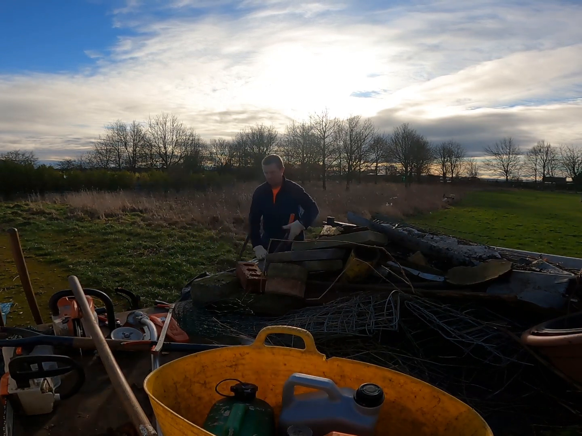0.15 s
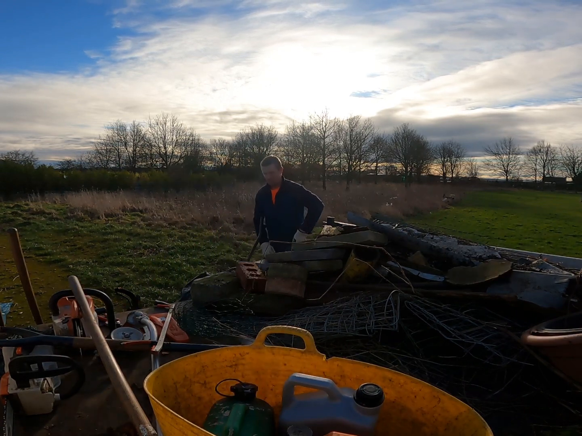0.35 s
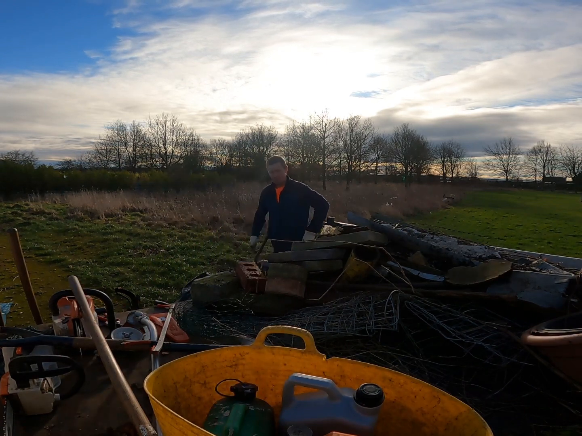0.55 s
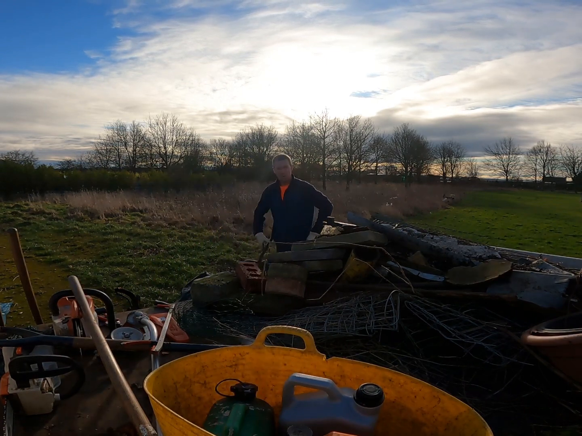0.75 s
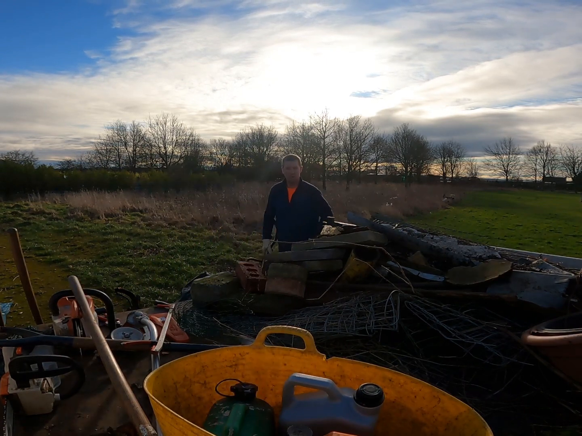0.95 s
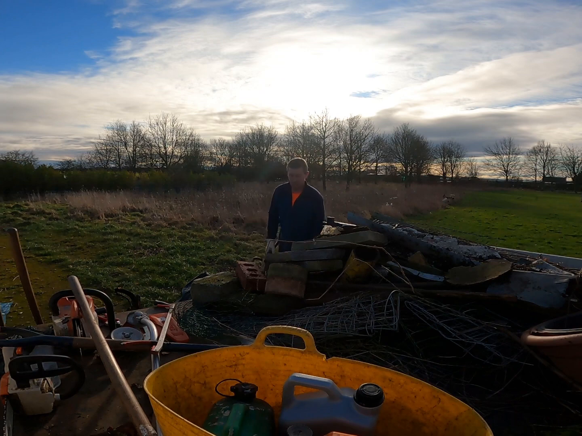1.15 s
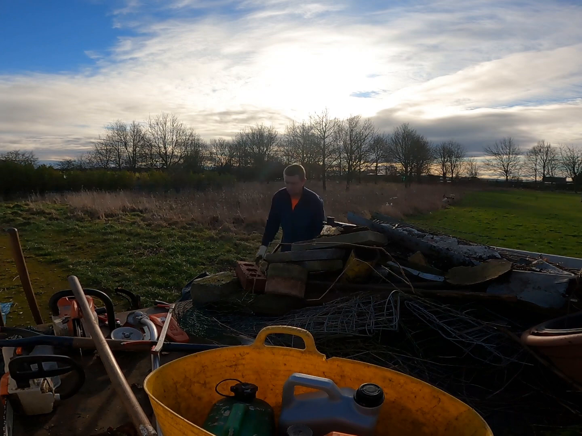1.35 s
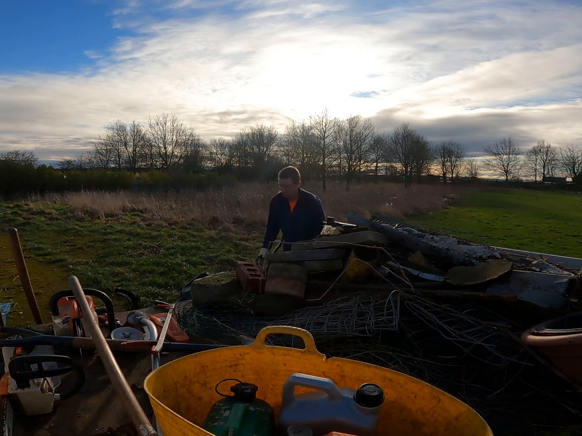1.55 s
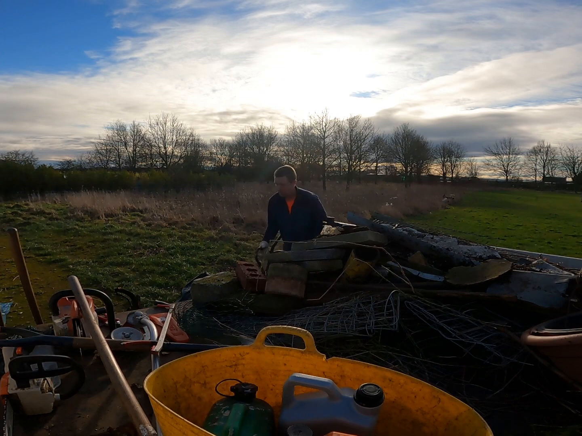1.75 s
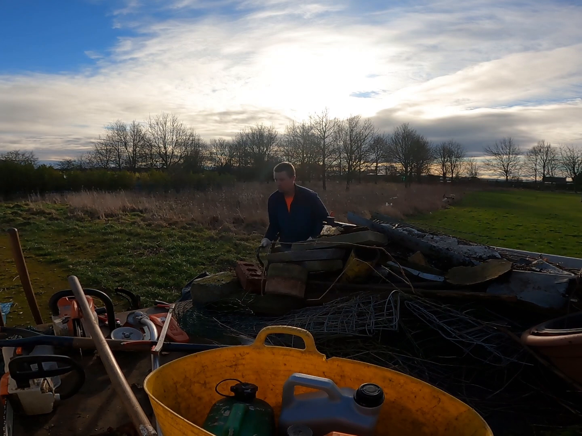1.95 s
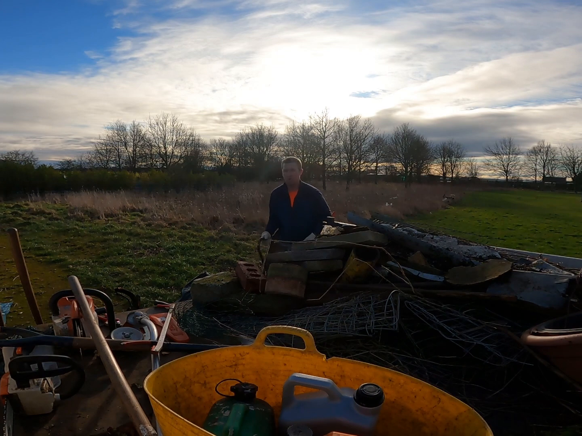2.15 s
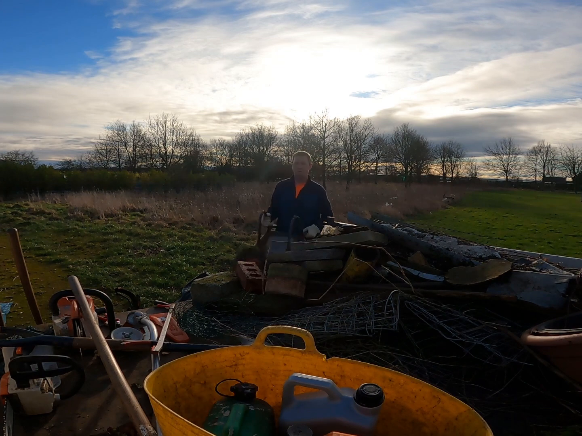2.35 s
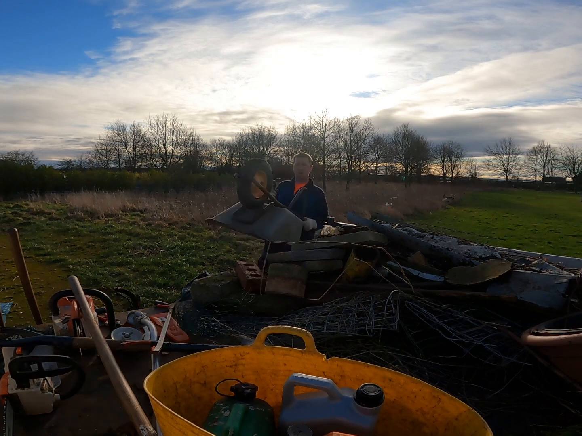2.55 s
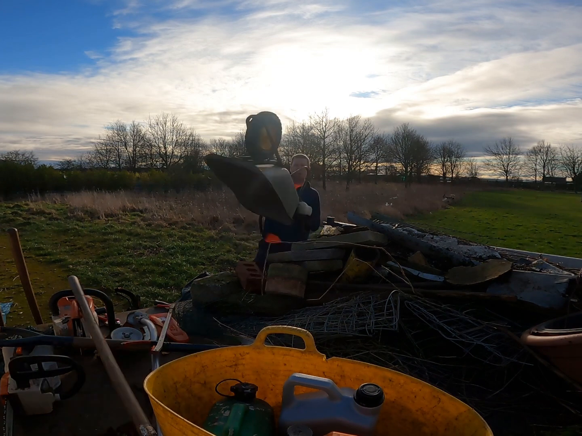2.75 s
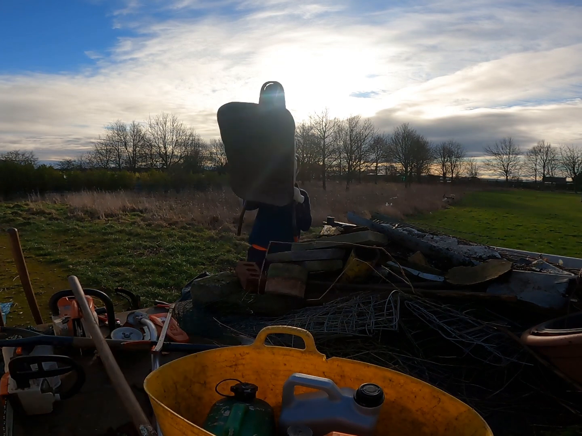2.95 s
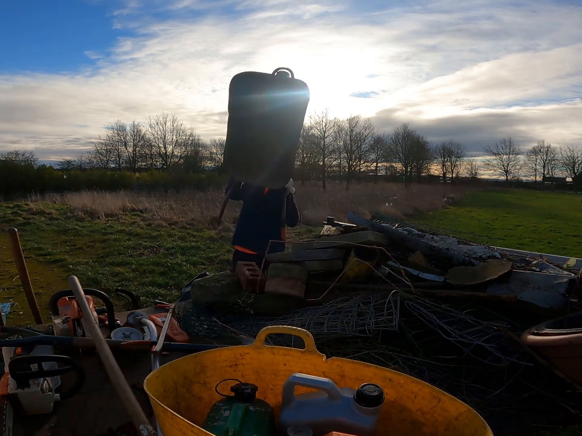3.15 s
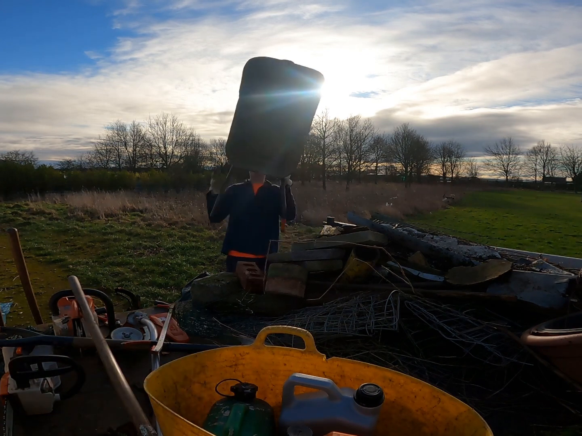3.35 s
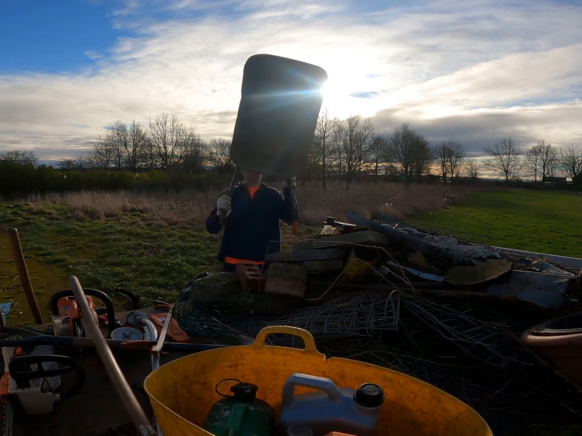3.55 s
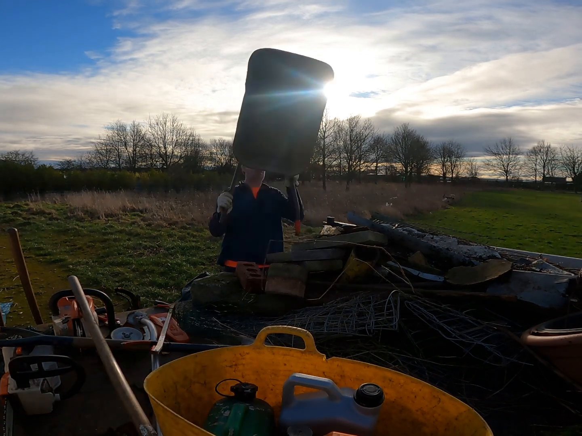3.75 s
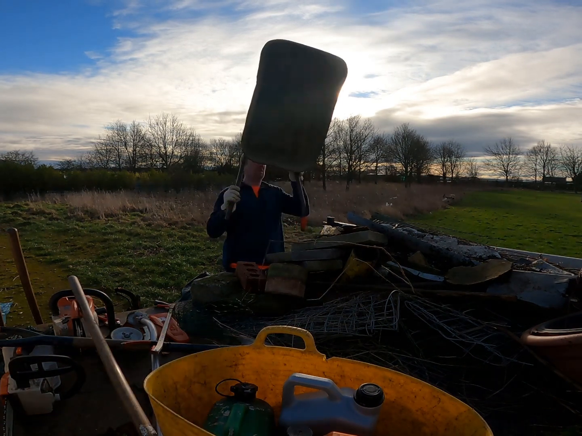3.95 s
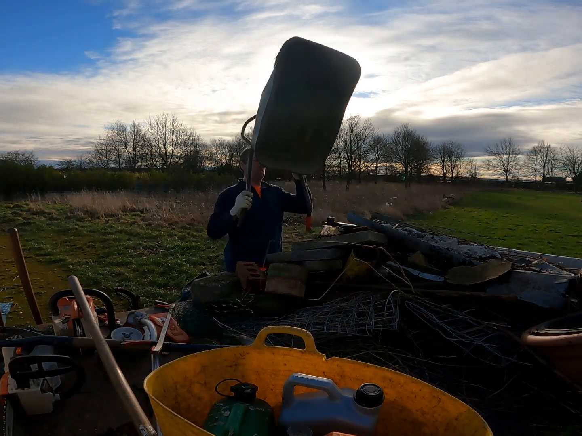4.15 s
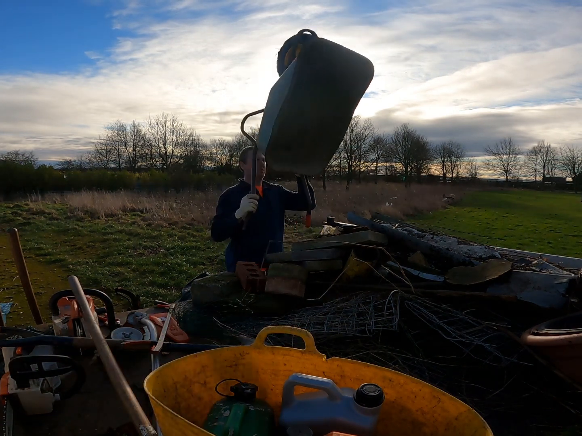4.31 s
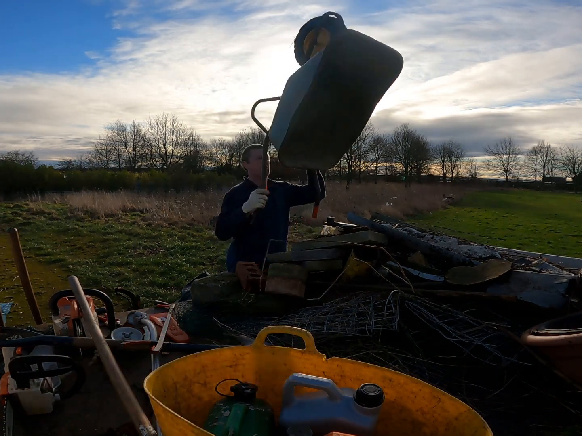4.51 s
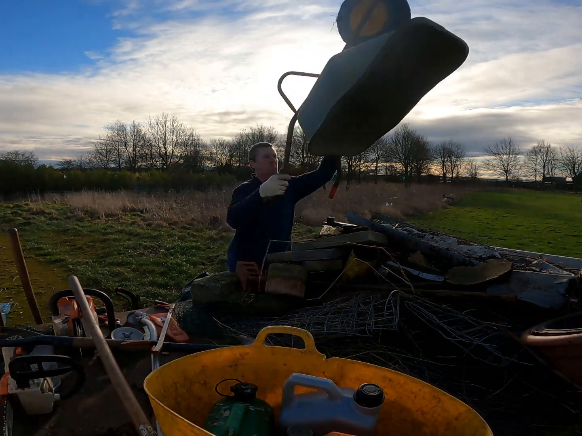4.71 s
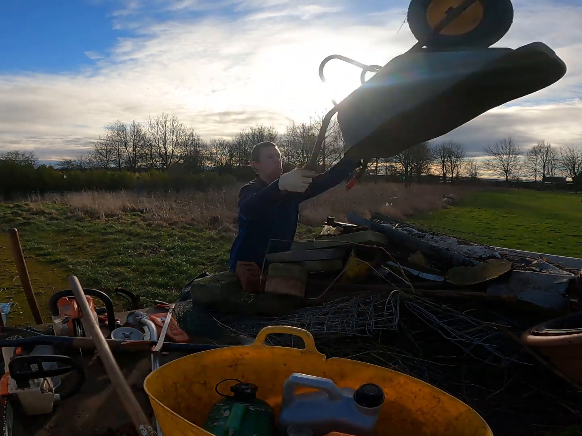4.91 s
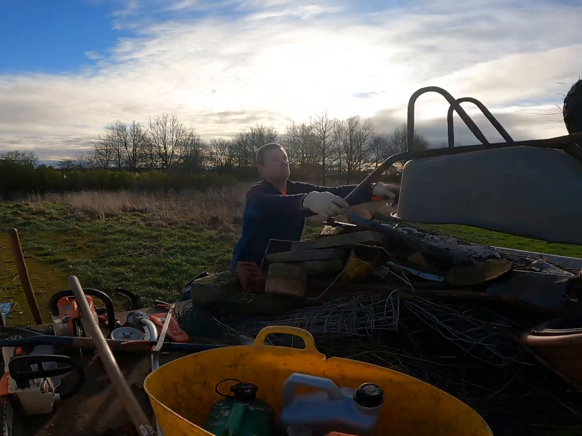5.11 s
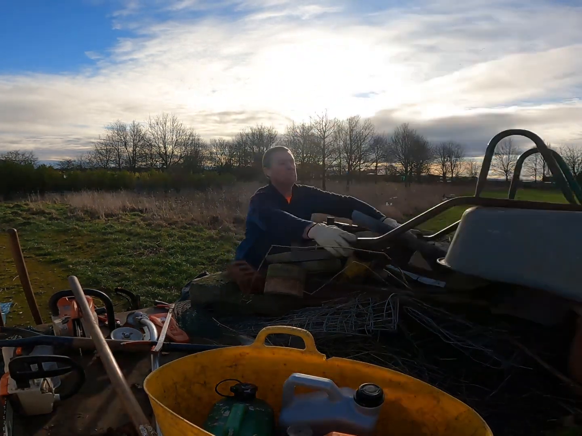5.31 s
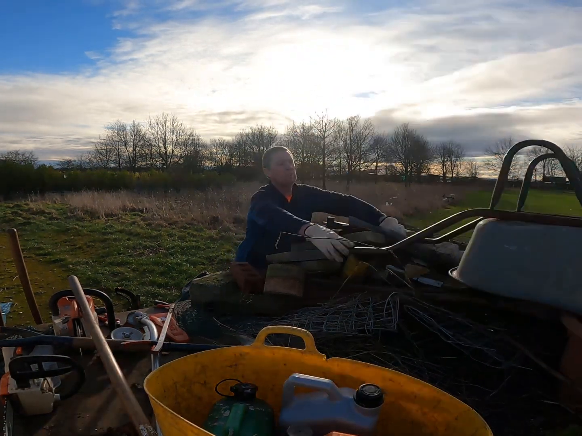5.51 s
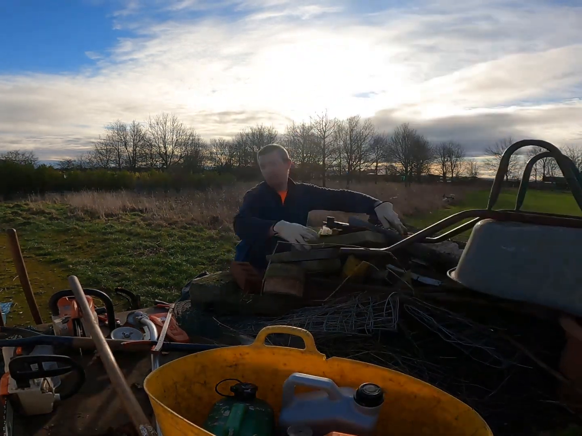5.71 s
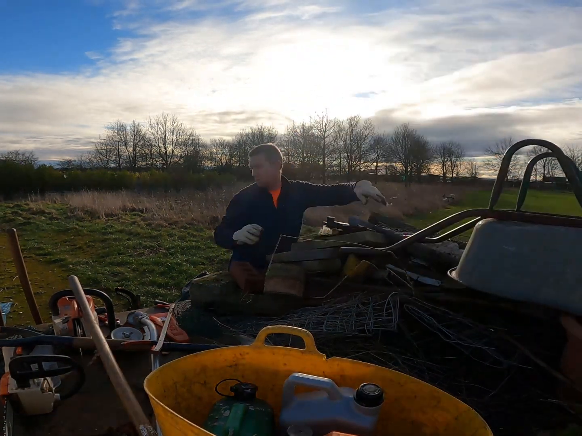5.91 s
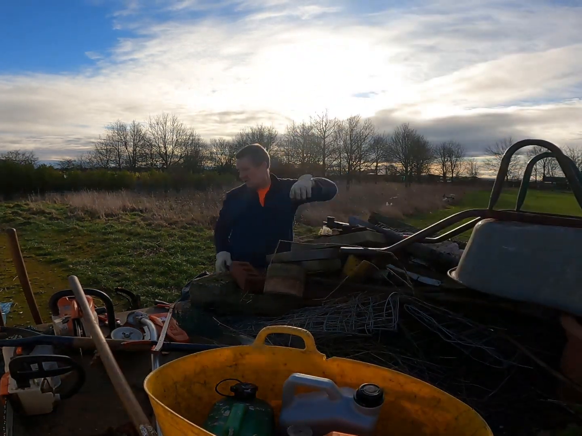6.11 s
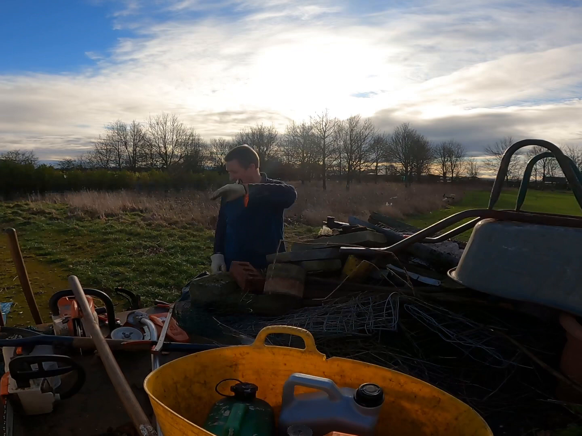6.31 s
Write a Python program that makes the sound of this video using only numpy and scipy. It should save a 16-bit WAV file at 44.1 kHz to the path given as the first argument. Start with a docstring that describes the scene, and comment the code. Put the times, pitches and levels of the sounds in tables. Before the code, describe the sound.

Quiet open air: distant traffic, wind rumble, a chirping bird and thin high whistles. Crunchy footsteps and cloth rustle lead to soft boomy bumps as an empty metal barrow is lifted. Its tray chatters in a fast, bouncing rattle, there is a pause with wind gusting, then one very loud, hard crash with deep thud, sheet steel clatter and debris, leaning right. Small clacks and a metallic clink end it. Microphone sits near the pile, dry outdoors.

```python
"""A steel wheelbarrow is hoisted overhead in a field, clatters as it is turned, and crashes onto rubbish on a trailer.
Each blow sums decaying tray and panel modes with chattering sheet steel; one tray mode hums as it is dragged.
The load thuds, crunches and scrapes in swings and gritty noise; a loose metal piece clinks in dying sines.
Around it: rustling steps and clothes in grainy noise, small birds in gliding sines,
light wind and a distant hum of traffic in shaped noise."""
import sys
import numpy as np
from scipy import signal
from scipy.fft import rfft, irfft, next_fast_len
from scipy.io import wavfile
from scipy.ndimage import uniform_filter1d

SR = 44100
rng = np.random.default_rng(int(sys.argv[2]) if len(sys.argv) > 2 else 0)


def materialize(psi):
    """Save the field psi as 16-bit PCM at rate SR to the path in sys.argv[1].

    A 1-D psi becomes a single channel; in a 2-D psi each row is a channel.
    """
    bounded = np.clip(np.atleast_2d(psi).T, -1, 1)
    quanta = np.round(bounded * 32767).astype(np.int16)
    wavfile.write(sys.argv[1], SR, quanta)


N = 280999
TIME = np.arange(N) / SR
TAIL = TIME[:3 * SR // 2]  # the longest a struck sound may ring


def amp(db):
    """Decibels to gain."""
    return 10 ** (np.asarray(db) / 20)


def unit(x):
    """Scales to an rms of one."""
    return x / np.sqrt(np.mean(x ** 2) + 1e-20)


def read(points, hz):
    """Reads a spectrum table on a log-frequency axis."""
    f, value = np.transpose(points)
    return np.interp(np.log(hz + 1), np.log(f + 1), value)


def level(curve):
    """Gain at every sample from rows (time [s], level [dB])."""
    return amp(np.interp(TIME, *np.transpose(curve)))


def add(mix, s, sound):
    """Mixes a sound in at s seconds."""
    part = mix[max(round(s * SR), 0):][:len(sound)]
    part += sound[:len(part)]


def colour(x, points):
    """Filters by a spectrum table."""
    size = next_fast_len(len(x))
    gain = amp(read(points, np.fft.rfftfreq(size, 1 / SR)))
    return irfft(rfft(x, size) * gain, size)[:len(x)]


def band(x, hz, spread):
    """A broad band from hz / spread to hz * spread."""
    edges = [hz / spread, hz * spread]
    return signal.sosfilt(signal.butter(2, edges, "band", fs=SR, output="sos"), x)


def grains(size, spread_db):
    """Noise made of tiny contacts of very uneven strength."""
    strength_db = spread_db * np.minimum(rng.exponential(1, size), 5)
    return unit(rng.standard_normal(size) * amp(strength_db))


def waver(length, size):
    """Slow chance, smoothed over size samples."""
    return unit(uniform_filter1d(rng.standard_normal(length), size=size))


def ringing(modes):
    """One dying sine for each mode, neighbours in opposite sign."""
    sines = []
    for k, (hz, db, t60) in enumerate(modes):
        sines.append((-1) ** k * amp(db - 60 * TAIL / t60) * np.sin(2 * np.pi * hz * TAIL))
    return np.array(sines)


# blows on the barrow: (time [s], strength [dB], centre of the boom [Hz], hardness as a cut-off [Hz])
BLOWS = [(2.621, -25.5, 180.6, 1200), (2.707, -29.5, 320, 880), (2.872, -27.5, 188.4, 680),
         (2.953, -29, 156, 930), (3.457, -32.5, 176, 830), (3.545, -32.5, 134, 1050),
         (5.072, -29, 308, 584), (5.200, -14.5, 122, 3630), (5.211, -12.5, 191, 4560),
         (5.236, -21, 270, 5030), (5.258, -27, 233, 2600), (5.320, -37, 292, 4030), (5.358, -23, 181, 1300),
         (5.380, -26.5, 149, 2140), (5.497, -26, 204, 4270)]
# turned overhead, the tray rocks against its frame, left and right in turn, rebounding ever sooner
RATTLE_S, REBOUND_S, REBOUND_SHRINK = 3.603, 0.058, 0.8  # start, first gap, ratio of each gap to the last
# loss and softening grow with the square of the rebound's number
RATTLE_DB, RATTLE_HARD_HZ, REBOUND_LOSS_DB, REBOUND_SOFTEN = -20, 4070, 0.49, 0.99
# the boom on either side of the rocking tray: (centre [Hz])
RATTLE_BOOM_HZ = [184, 114]


def blows():
    """All blows, including the tray's rebounds, which die faster and faster as the rocking collapses."""
    gaps = REBOUND_S * REBOUND_SHRINK ** np.arange(5)
    times = RATTLE_S + np.cumsum(np.r_[0, gaps])
    rattle = []
    for n, s in enumerate(times):
        db = RATTLE_DB - REBOUND_LOSS_DB * n ** 2
        hard_hz = RATTLE_HARD_HZ * REBOUND_SOFTEN ** n ** 2
        rattle.append((s, db, RATTLE_BOOM_HZ[n % 2], hard_hz))
    return BLOWS + rattle


# the tray's panels ringing: (frequency [Hz], level [dB])
PANEL_MODES = [(393, 3.5), (418, -3), (492, -4), (521, 0), (803, -11), (897, -11), (952, -10), (1163, -9),
               (1647, -13), (1703, -15)]
LOWEST_PANEL_T60_S, PANEL_WAVER_HZ = 0.6, 7.5


def panels():
    """The panel modes waver in pitch as the tray flexes; the higher ones die sooner."""
    hz, db = np.transpose(PANEL_MODES)[:, :, None]
    pitch = hz + PANEL_WAVER_HZ * np.array([waver(len(TAIL), size=500) for _ in PANEL_MODES])
    t60 = LOWEST_PANEL_T60_S * np.sqrt(hz[0] / hz)
    return amp(db - 60 * TAIL / t60) * np.sin(2 * np.pi * np.cumsum(pitch, axis=1) / SR)


# the crowd of higher sheet modes: (frequency [Hz], relative level per Hz [dB])
SHEET = [(50, -6.5), (130, 11), (300, 2.5), (1100, 0), (1800, -4.5), (2800, -8.5), (4500, -9), (6500, -16),
         (9000, -29), (12500, -23), (15500, -37)]
# how long the sheet modes ring: (frequency [Hz], t60 [s])
SHEET_T60 = [(500, 0.78), (1200, 0.57), (5000, 0.18), (12000, 0.54)]


def sheet_response():
    """Countless close modes of thin steel, each band dying at its own rate."""
    crowd = unit(colour(rng.standard_normal(len(TAIL)), SHEET))
    hz, t, z = signal.stft(crowd, SR, nperseg=512)
    decay = amp(-60 * t / read(SHEET_T60, hz)[:, None])
    return signal.istft(z * decay, SR, nperseg=512)[1][:len(TAIL)]


# the whole tray flexing, before the hold damps it: (frequency [Hz], level [dB], t60 [s])
BOOM = [(122.2, 4, 0.66), (151.4, -4.5, 1.26), (185, -2.5, 1.45), (206.5, -1, 1.5), (241.3, 5.5, 0.99)]
# how the barrow is held (in the arms, overhead, coming down) decides how it answers a blow:
# (from time [s], boom added to strength [dB], ring added to strength [dB], boom damping [dB per s])
HOLDS = [(0, 8, -21, 6.3), (3.3, 1.5, 0, 28), (4.9, 0, -12.5, 40)]


def barrow(boom_octaves=0.23, boom_rise=0.0013, ring_rise=0.0089, strike_spread=0.12,
           first_touch=0.86, rattle_db=0.5, chatter=0.0096):
    """Each blow flexes the tray, rings its panels and chatters on the sheet steel."""
    out, boom = np.zeros(N), ringing(BOOM)
    mode_hz = np.array(BOOM)[:, 0]
    sheets = [sheet_response() for _ in range(4)]
    t = TIME[:SR // 8]
    for k, (s, strength_db, boom_hz, hard_hz) in enumerate(blows()):
        _, boom_db, ring_db, damping = [hold for hold in HOLDS if hold[0] <= s][-1]
        # where the blow lands decides which modes answer
        share = np.exp(-0.5 * (np.log2(mode_hz / boom_hz) / boom_octaves) ** 2)
        low = amp(strength_db + boom_db - damping * TAIL) * (share @ boom)
        low *= 1 - np.exp(-TAIL / boom_rise)
        strikes = 1 + strike_spread * rng.standard_normal(len(PANEL_MODES))
        ring = amp(strength_db + ring_db) * (strikes @ panels())
        ring *= 1 - np.exp(-TAIL / ring_rise)
        # one firm touch, then a dying chatter of lighter ones
        force = grains(len(t), 6.36) * np.exp(-t / chatter)
        force /= np.linalg.norm(force)
        force[0] += first_touch
        force /= np.linalg.norm(force)
        clatter = amp(strength_db) * signal.fftconvolve(force, sheets[k % len(sheets)])[:len(TAIL)]
        # loose parts lift off and touch again, so the clatter comes in lumps
        lumps = waver(len(TAIL), size=350)
        clatter *= amp(rattle_db * lumps * np.minimum(TAIL / chatter / 2, 1))
        # a soft contact cannot excite the treble
        contact = signal.butter(2, hard_hz, fs=SR, output="sos")
        add(out, s, low + signal.sosfilt(contact, ring + clatter))
    return out


# the tray hums on one mode as it is dragged up off the pile: (time [s], level [dB])
DRAG = [(2.63, -36), (2.70, -43), (2.84, -20.5), (2.89, -22.5), (3.04, -30.5), (3.45, -66)]
DRAG_START_HZ, DRAG_SAG_HZ_PER_S = 211, 15.97


def drag(wander=0.026):
    """Friction keeps one tray mode humming; its pitch sags and wavers."""
    start, end = DRAG[0][0], DRAG[-1][0]
    sagging_hz = DRAG_START_HZ - DRAG_SAG_HZ_PER_S * (TIME - start)
    hz = sagging_hz * (1 + wander * waver(N, size=600))
    hum = np.sin(2 * np.pi * np.cumsum(hz) / SR)
    return hum * level(DRAG) * (TIME > start) * (TIME < end)


# steel sliding over the rubbish: (start [s], length [s], level [dB], centre [Hz])
SCRAPES = [(5.321, 0.017, -33.5, 3380), (5.484, 0.06, -32.5, 1060), (5.491, 0.063, -45.5, 3970)]
SCRAPE_ATTACK_S, SCRAPE_RELEASE_S = 0.0045, 0.014


def scrapes(spread=1.3, grain_db=4):
    """Short gritty slides that start, hold and stop."""
    out, t = np.zeros(N), TIME[:SR // 2]
    for s, length, db, hz in SCRAPES:
        slide = np.minimum(t / SCRAPE_ATTACK_S, 1)
        slide *= np.exp(-np.maximum(t - length, 0) / SCRAPE_RELEASE_S)
        grit = unit(band(grains(len(t), grain_db), hz, spread))
        add(out, s, amp(db) * slide * grit)
    return out


# dull knocks and thuds of handling, wind buffets and the trailer bed:
# (time [s], level [dB], frequency [Hz], t60 [s])
THUDS = [(0.02, -17, 132.4, 0.092), (2.62, -18, 1343, 0.025), (2.705, -29.5, 513, 0.026),
         (3.573, -21.5, 115, 0.31), (4.356, -25.5, 168, 0.23), (4.422, -24.5, 96.4, 0.41),
         (4.954, -12, 71, 0.25), (5.202, -4, 93, 0.18), (5.233, -16, 128, 0.076), (5.437, -17, 97.7, 0.58)]
# heavy steps into the undergrowth, which also crunch: (time [s], level [dB])
STEPS = [(1.907, -38.5), (2.05, -32.5)]
STEP_HZ, STEP_T60_S = 132, 0.95


def thuds(rise=0.004, loose=0.75, spread=1.6):
    """A low swing that dies away, with an irregular rumble around it."""
    out = np.zeros(N)
    footfalls = [(s, db, STEP_HZ, STEP_T60_S) for s, db in STEPS]
    for s, db, hz, t60 in THUDS + footfalls:
        rumble = unit(band(rng.standard_normal(len(TAIL)), hz, spread))
        swing = np.sin(2 * np.pi * hz * TAIL) + loose * rumble
        add(out, s, swing * amp(db - 60 * TAIL / t60) * (1 - np.exp(-TAIL / rise)))
    return out


# snaps and clacks of twigs, the frame and brittle rubbish:
# (time [s], level [dB], centre [Hz], t60 [s])
SNAPS = [(.070, -40, 1100, 0.063), (.122, -46, 1200, 0.063), (.249, -44.5, 1980, 0.28),
         (1.907, -38, 835, 0.071), (2.051, -40.5, 2980, 0.17), (2.185, -46, 1930, .16),
         (2.621, -51, 2600, 0.045), (3.085, -45, 2100, .09), (3.118, -50, 2350, 0.055),
         (3.457, -48, 3300, 0.2), (3.493, -39.5, 2940, 0.24), (5.1995, -4, 1770, 0.0043),
         (5.211, -35, 11000, 0.21), (5.338, -37.5, 11000, 0.028), (5.773, -50, 2840, .07),
         (5.832, -38.5, 1600, .05), (5.862, -32.5, 1510, 0.093), (6.122, -50, 2500, 0.031),
         (6.190, -53, 5860, 0.038)]
# the crack at the point of contact; its level is relative to the blow, its pitch a share of the hardness
CRACK_DB, CRACK_T60_S, CRACK_PITCH = -10, 0.13, 0.78
# the crunch under each step; its level is relative to the step
CRUNCH_DB, CRUNCH_HZ, CRUNCH_T60_S = -6.5, 695, 0.85


def cracks():
    """Everything brittle: snaps, the contact of each blow and the crunch of each step."""
    contacts = [(s, db + CRACK_DB, CRACK_PITCH * hard_hz, CRACK_T60_S) for s, db, _, hard_hz in blows()]
    crunches = [(s, db + CRUNCH_DB, CRUNCH_HZ, CRUNCH_T60_S) for s, db in STEPS]
    return SNAPS + contacts + crunches


def snaps(spread=1.588, grain_db=4):
    """Sprays of brittle cracks: grainy noise in a band, dying away."""
    out, t = np.zeros(N), TIME[:SR // 2]
    for s, db, hz, t60 in cracks():
        spray = unit(band(grains(len(t), grain_db), hz, spread))
        add(out, s, spray * amp(db - 60 * t / t60))
    return out


# the tubular frame striking the load: (time [s], level [dB])
CLANKS = [(5.214, -28), (5.317, -42), (5.535, -48)]
# the frame's modes: (frequency [Hz])
FRAME_HZ = [2257, 2862, 3129, 3900, 4480, 5200]
FRAME_T60_S = 0.24


def clanks():
    """The tubular frame strikes the load, its modes answering in a different balance each time."""
    out = np.zeros(N)
    for s, db in CLANKS:
        modes = ringing([(hz, db, FRAME_T60_S) for hz in FRAME_HZ])
        add(out, s, rng.uniform(0.35, 1, len(FRAME_HZ)) @ modes)
    return out


# a loose metal piece touching: (time [s], level [dB])
CLINKS = [(5.687, -50.5), (5.773, -54), (5.892, -35)]
# its modes: (frequency [Hz], level [dB], t60 [s])
CLINK_MODES = [(1249, -11, .13), (1841, 4, .09), (2272, -5, .1), (2681, -1, .4), (3160, -5, .1),
               (3575, -8, .2)]


def clinks():
    """The loose piece taps twice, then strikes and rings on its own modes."""
    out, ring = np.zeros(N), ringing(CLINK_MODES).sum(0)
    for s, db in CLINKS:
        add(out, s, amp(db) * ring)
    return out


# rustles of clothes and dry grass, one for each movement: (start [s], length [s], level [dB])
RUSTLE = [(0, 0.5, -54), (1.902, 0.23, -49), (2.507, 0.089, -42.5), (2.747, 0.43, -53), (3.259, 0.12, -49),
          (3.48, 0.64, -52), (4.286, 0.65, -58.5), (4.825, 0.8, -48), (5.297, 0.69, -53.5)]
RUSTLE_ATTACK_S, RUSTLE_RELEASE_S, RUSTLE_REST_DB = 0.094, 0.042, -61.5


def movement():
    """Each movement swells, holds and dies away, over a faint stir."""
    swells = np.zeros(N)
    for s, length, db in RUSTLE:
        attack = np.clip((TIME - s) / RUSTLE_ATTACK_S, 0, 1)
        release = np.exp(-np.maximum(TIME - s - length, 0) / RUSTLE_RELEASE_S)
        swells += amp(db) * attack * release
    return np.hypot(amp(RUSTLE_REST_DB), swells)


# tone of cloth and grass: (frequency [Hz], relative level per Hz [dB])
RUSTLE_COLOUR = [(200, 15.5), (900, 14), (2000, 7), (4000, 3), (7500, -5.5), (9500, -16.5), (12500, -22.5),
                 (15000, -9.5)]


def rustle(grain_db=4):
    """Fine crackle that comes in clumps as cloth and stalks rub."""
    clumps = amp(1.4 * waver(N, size=600))
    return movement() * unit(colour(grains(N, grain_db) * clumps, RUSTLE_COLOUR))


def note(length, start_hz, end_hz, bend, unsteady):
    """One bird note: a glide that comes early (bend under 1) or late (bend over 1)."""
    u = np.linspace(0, 1, round(length * SR))
    glide = start_hz + (end_hz - start_hz) * u ** bend
    hz = glide * (1 + unsteady * waver(len(TAIL), size=200)[:len(u)])
    return np.sin(2 * np.pi * np.cumsum(hz) / SR) * np.sin(np.pi * u) ** 0.5


# a small bird's run of hooked notes that hold, then drop: (time [s], top [Hz], level [dB])
SONG = [(1.069, 3850, -57), (1.140, 3750, -59.5), (1.227, 4060, -58.5), (1.308, 4060, -55),
        (1.398, 4220, -57.5), (1.491, 4350, -58)]
HOOK_S, HOOK_END_HZ, HOOK_BEND = 0.066, 2550, 3
# short wavering pips among them: (time [s], frequency [Hz], level [dB])
PIPS = [(1.06, 2220, -60), (1.101, 4060, -57), (1.148, 3180, -55), (1.242, 3190, -50), (1.594, 4330, -60),
        (1.642, 4020, -60)]
# the closing flourish of down-slurred notes: (time [s], end [Hz], level [dB])
FLOURISH = [(1.790, 3990, -51.5), (1.812, 4450, -58), (1.826, 3340, -52.5), (1.909, 3730, -46.5),
            (2.117, 3740, -46)]
PIP_S, SLUR_S, SLUR_DROP_HZ = 0.028, 0.036, 900
# thin high whistles of a second bird: (time [s], length [s], start [Hz], end [Hz], level [dB])
WHISTLES = [(0.477, 0.093, 8300, 8500, -75), (0.743, 0.048, 8400, 7770, -66),
            (0.912, 0.076, 8540, 6030, -62), (0.955, 0.049, 8730, 7700, -62),
            (1.85, .25, 7550, 7000, -64.5), (2.17, 0.12, 7120, 6840, -59),
            (2.388, 0.064, 6950, 6160, -58.5), (2.65, 0.12, 5100, 5080, -71.5)]


def birds(echo_db=-3, echo_t60=0.28, warble=0.0314, whistle_warble=0.0052):
    """A warbled phrase and thin, pure high whistles, scattered by the hedges."""
    out = np.zeros(N)
    for s, hz, db in SONG:
        add(out, s, amp(db) * note(HOOK_S, hz, HOOK_END_HZ, HOOK_BEND, warble))
    for s, hz, db in PIPS:
        add(out, s, amp(db) * note(PIP_S, hz, hz, 1, warble))
    for s, hz, db in FLOURISH:
        add(out, s, amp(db) * note(SLUR_S, hz + SLUR_DROP_HZ, hz, 0.46, warble))
    for s, length, start_hz, end_hz, db in WHISTLES:
        add(out, s, amp(db) * note(length, start_hz, end_hz, 1, whistle_warble))
    hedges = rng.standard_normal(len(TAIL)) * amp(-60 * TAIL / echo_t60)
    return out + amp(echo_db) * signal.fftconvolve(out, hedges / np.linalg.norm(hedges))[:N]


# wind on the microphone: (time [s], level [dB])
WIND = [(0, -29.5), (.8, -49), (1.7, -44.5), (2.45, -43.5), (3.5, -39), (4.45, -32.5), (5.4, -40.5),
        (6.37, -47.5)]
# wind that differs between the two ports: (time [s], level [dB])
EDDIES = [(2.5, -69), (4.0, -59), (4.4, -34), (5.1, -45.5), (5.7, -56)]
# tone of both: (frequency [Hz], relative level per Hz [dB])
WIND_COLOUR = [(10, -11.5), (40, 0), (100, -7.5), (400, -31), (1500, -73)]


def wind(curve):
    """Low buffets of moving air: dark noise that swells along a level curve."""
    return level(curve) * unit(colour(rng.standard_normal(N), WIND_COLOUR))


# far traffic and open air: (time [s], level [dB])
AIR = [(0, -45), (.6, -51), (4.4, -51.5), (6.37, -63.5)]
# its tone: (frequency [Hz], relative level per Hz [dB])
AIR_COLOUR = [(30, -39), (200, 17.5), (1000, 14.5), (1600, 3), (2600, -14.5), (4200, -9), (8000, -60),
              (15000, -44.5)]


def far_traffic():
    """Many distant sources blur into a smooth hum of shaped noise."""
    return level(AIR) * unit(colour(rng.standard_normal(N), AIR_COLOUR))


# how far the barrow is off to the right: (time [s], level of the side signal [dB])
SWING = [(2.5, -43), (3.8, -12), (4.9, -1.5)]
# stereo width of the handling: (frequency [Hz], side level [dB])
WIDTH = [(120, -32.5), (380, -13.5), (1300, -5), (2400, -11.5), (9000, -2.5)]


def scene(scatter_s=0.0014, lean=0.23):
    """The sounds start straight ahead; as the barrow swings right they lean that way and scatter off the load."""
    handling = barrow() + drag() + scrapes() + thuds() + snaps() + clanks() + clinks() + rustle()
    t = TIME[:SR // 20]
    clutter = rng.standard_normal(len(t)) * np.exp(-t / scatter_s)
    scattered = signal.oaconvolve(handling, clutter / np.linalg.norm(clutter))[:N]
    side = level(SWING) * colour(scattered - lean * handling, WIDTH)
    # eddies press on the two microphone ports unequally
    side += wind(EDDIES)
    mid = handling + birds() + wind(WIND) + far_traffic()
    return np.array([mid + side, mid - side])


# the microphone's response: (frequency [Hz], gain [dB])
MICROPHONE = [(9000, 0), (12800, 2), (15000, -18)]
EDGE_HZ = 15400


def record(dry):
    """The microphone colours the top octave and rounds off the highest peaks; then the band limit."""
    heard = np.array([colour(channel, MICROPHONE) for channel in dry])
    rounded = heard / (1 + heard ** 6) ** (1 / 6)
    band_limit = signal.firwin(511, EDGE_HZ, window=("kaiser", 9), fs=SR)
    return signal.oaconvolve(rounded, band_limit[None], "same")


dry = scene()
out = record(dry)
materialize(out)
```